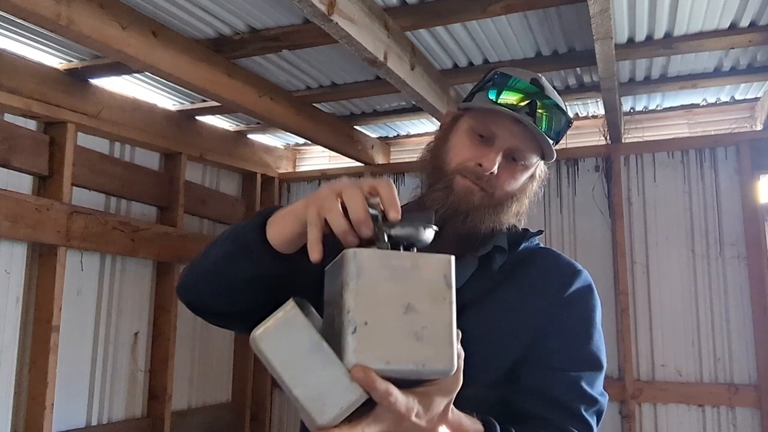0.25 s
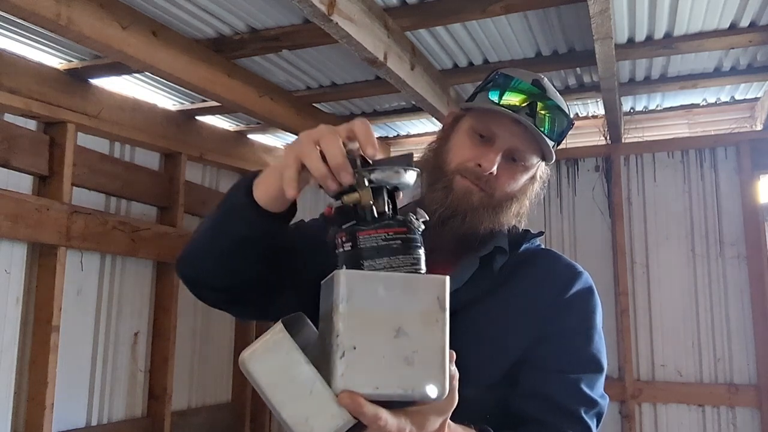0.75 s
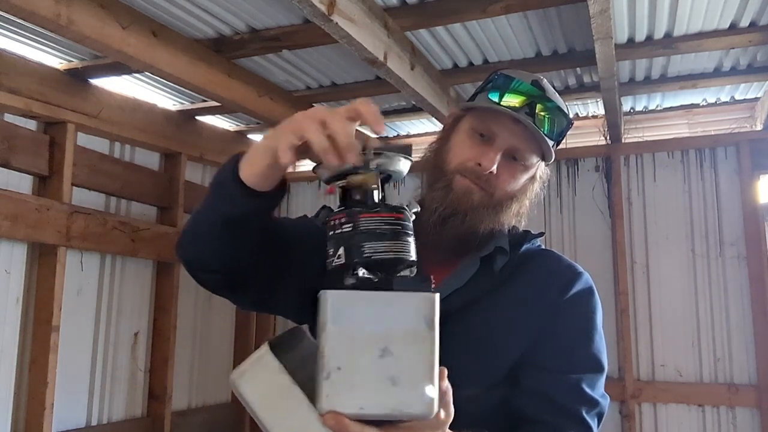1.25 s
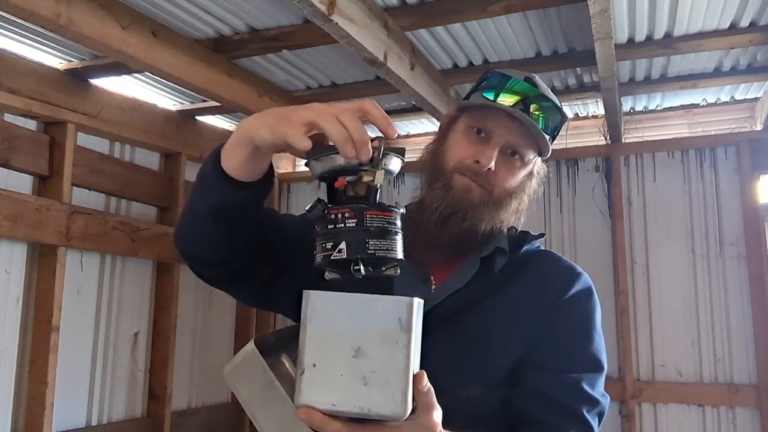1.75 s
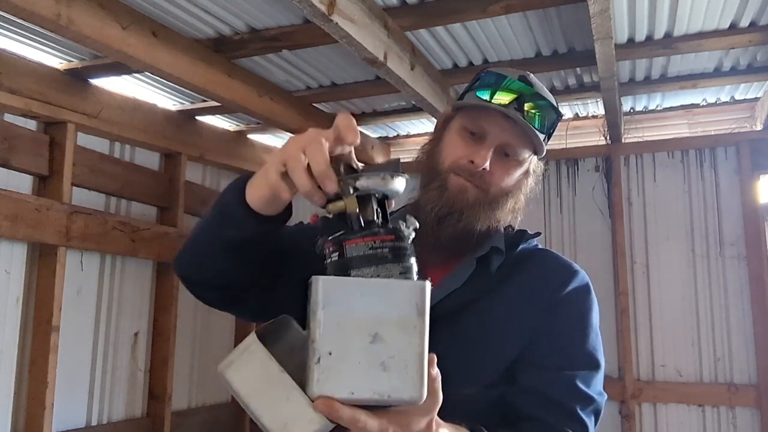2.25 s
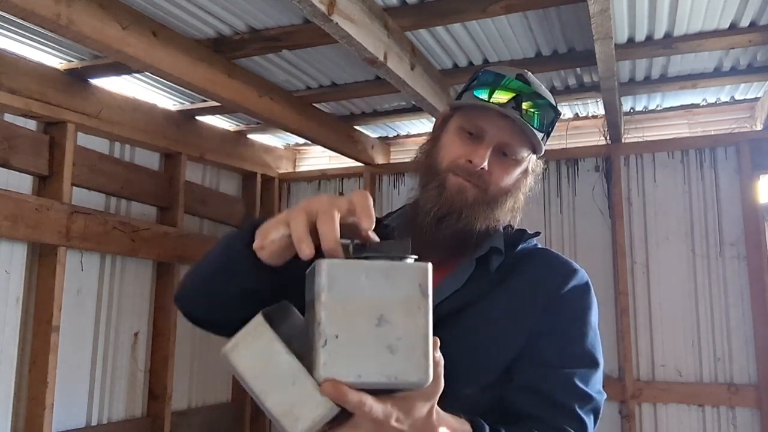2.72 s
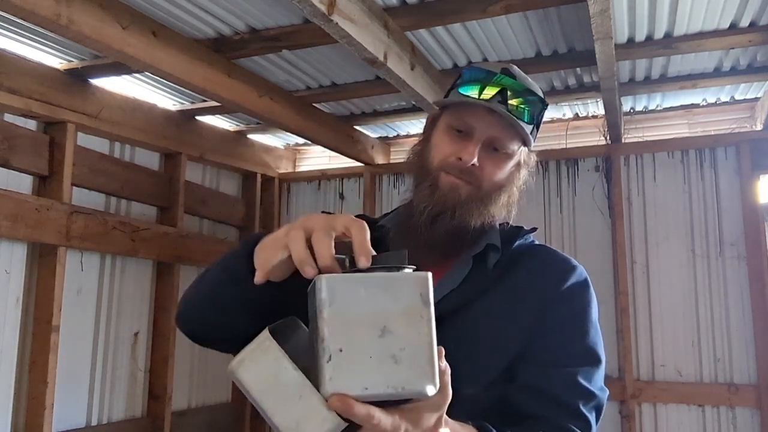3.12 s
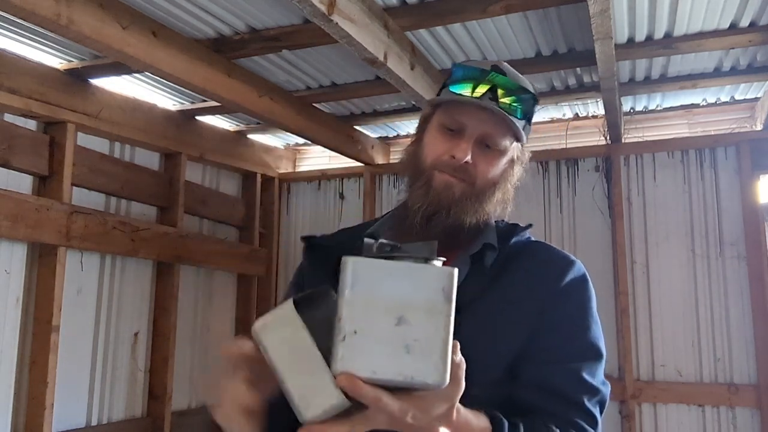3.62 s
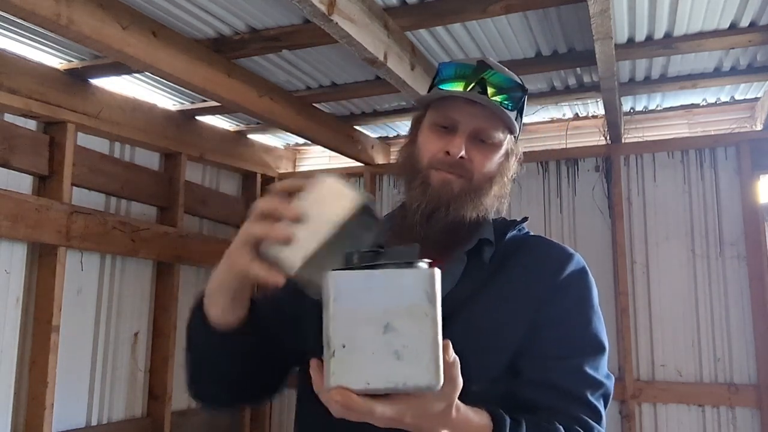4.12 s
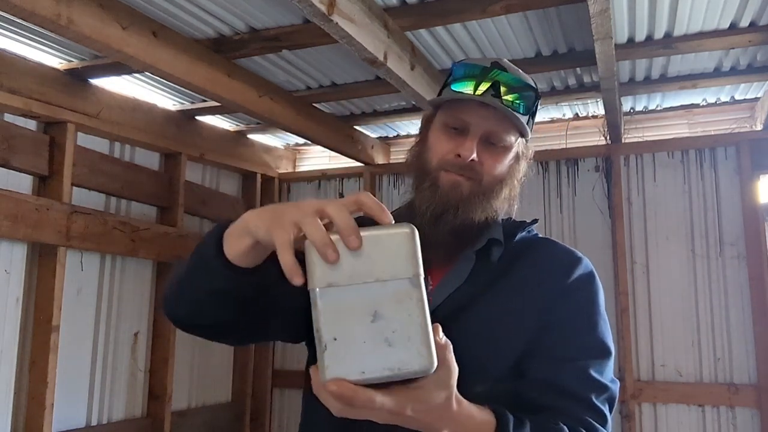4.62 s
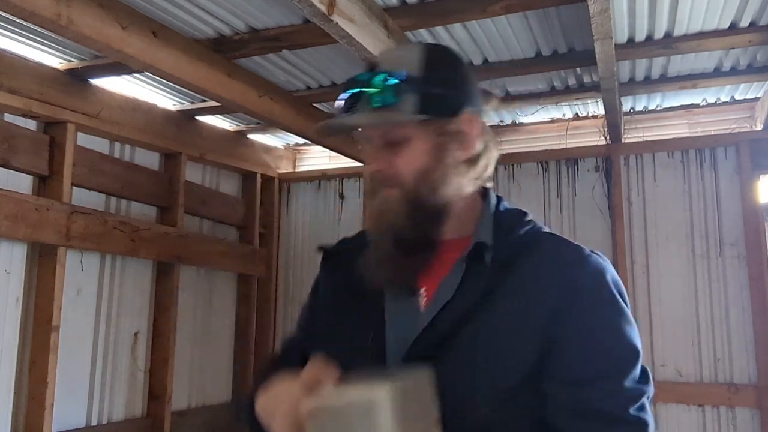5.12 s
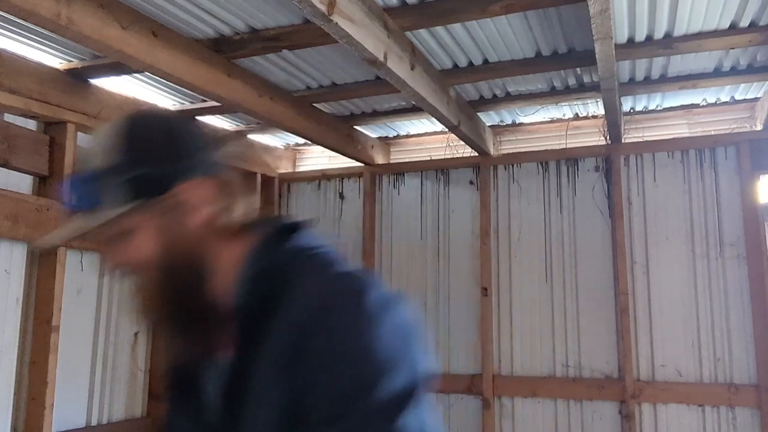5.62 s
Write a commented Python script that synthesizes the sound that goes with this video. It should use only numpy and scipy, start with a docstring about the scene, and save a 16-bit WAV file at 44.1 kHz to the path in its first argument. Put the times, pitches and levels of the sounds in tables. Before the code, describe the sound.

Close handheld metal handling with a short shed reverberation: soft scrapes and small steel pings first, quiet air with distant bird-like chirps next, then a loud ringing clank and a run of boxy knocks. Lighter rattles settle, the lid scrapes and clatters into place with low thuds, and stiff cloth crinkles as the holder turns away.

```python
"""A hand-held square sheet-metal pot knocks, rattles and scrapes in an open shed as a small stove is lifted
out, lowered back in and covered with the lid. Blows ring damped modes over a dense wash; slides excite both
with stick-slip noise. Loose steel parts, and the pot itself after its first hard blow, ping as longer damped
sines, soft pushes are low ones, and a jacket rustles in bursts of filtered noise as the holder turns away.
Faint chirps, a wavering hum and distant air fill the pauses."""
import sys
import numpy as np
from scipy import signal
from scipy.fft import rfft, irfft, next_fast_len
from scipy.io import wavfile
from scipy.ndimage import uniform_filter1d, map_coordinates

SR = 44100
rng = np.random.default_rng(int(sys.argv[2]) if len(sys.argv) > 2 else 0)


def nominal_scale(level):
    """Amplitude ratio for a level in decibels (scalar or array-like)."""
    x = np.asarray(level, float) / 20
    return 10 ** x


def unload_wav(signal):
    """Save mono or channel-first audio to the path in sys.argv[1] as 16-bit WAV at rate SR, clipped to [-1, 1]."""
    wavfile.write(
        sys.argv[1],
        SR,
        np.round(np.clip(np.atleast_2d(signal).T, -1, 1) * 32767).astype(np.int16),
    )


N = 258405
BOOM_HZ, RIM_HZ = 800, 4500  # wall boom lies below the first, rim brightness above the second, clank between


def unit(x):
    """Normalisation: scale to rms 1."""
    return x / np.sqrt(np.mean(x ** 2) + 1e-20)


def along(points, hz):
    """Logarithmic pitch scale: read (Hz, value) points on a log axis."""
    f, v = np.transpose(points)
    return np.interp(np.log(hz + 1), np.log(f + 1), v)


def wobble(rate):
    """Slow random modulation: a smooth curve through rate random knots a second."""
    knots = rng.standard_normal(int(N * rate / SR) + 4)
    return map_coordinates(knots, [np.arange(N) * rate / SR])


def filtered(x, response):
    """Linear filtering: the spectrum of x times a complex response of frequency."""
    m = next_fast_len(N + SR // 2)
    return irfft(rfft(x, m) * response(np.fft.rfftfreq(m, 1 / SR)), m)[..., :N]


def registers(x, response):
    """Band splitting: low, middle and high parts of stereo x after a response, each of rms 1."""
    def split(hz):
        below_boom = 1 / (1 + (hz / BOOM_HZ) ** 8)
        below_rim = 1 / (1 + (hz / RIM_HZ) ** 8)
        return np.array([below_boom, below_rim - below_boom, 1 - below_rim])[:, None]
    return np.array([unit(part) for part in filtered(x, lambda hz: split(hz) * response(hz))])


def pair(alike):
    """Interchannel coherence: two white noises of a given likeness."""
    a, b = rng.standard_normal((2, N))
    turn = np.arccos(np.clip(alike, -1, 1)) / 2
    return np.array([np.cos(turn) * a + np.sin(turn) * b, np.cos(turn) * a - np.sin(turn) * b])


def ring(modes, gains, spread, attack, fuzz_hz):
    """Modal synthesis: damped sines of unsteady pitch, each reaching the two ports with its own phase."""
    hz, db, t60 = np.transpose(modes)[:, :, None]
    hold = 64  # samples between changes of pitch
    t = np.arange(360 * hold) / SR
    decay = gains[:, None] * nominal_scale(db - 60 * t / t60)
    waver = np.repeat(rng.standard_normal((len(hz), 360)), hold, axis=1)
    phase = 2 * np.pi * np.cumsum(hz + fuzz_hz * waver, axis=1) / SR
    skew = spread * rng.standard_normal(hz.shape)
    ports = [(decay * np.sin(phase + side * skew)).sum(0) for side in (1, -1)]
    return np.array(ports) * (1 - np.exp(-t / attack))


def add(mix, sound, s):
    """Superposition: mix a stereo sound in at time s."""
    i = round(s * SR)
    mix[:, i:i + sound.shape[1]] += sound[:, :N - i]


def stroke_db(start, length, press_db, rise, fall):
    """Envelope of one movement, 0 dB at its end: rise and fall in dB a second around a steady press."""
    t = np.arange(N) / SR - start
    onset = rise * np.minimum(t, 0)
    press = press_db * (1 - np.clip(t / length, 0, 1))
    release = fall * np.maximum(t - length, 0)
    return onset - press - release


# Spectrum of the distant air. Each row: frequency in Hz, relative density in dB per Hz.
AIR_SPECTRUM = [(26, -48), (45, -3.5), (123, -3), (170, -11.5), (411, -18.5), (1130, -32.5), (1510, -35.5),
                (1930, -42), (2940, -43), (5430, -54.5), (16000, -69.5)]
# Coherence of the air at the two ports. Each row: frequency in Hz, left-right likeness from 0 to 1.
AIR_COHERENCE = [(60, 0.49), (950, 0.081), (15000, 0.08)]
AIR_DB, HUM_DB = -55.5, -54.5  # levels about which air and hum waver


def air():
    """Diffuse-field coherence: far rumble most alike in the bass, and a frequency-modulated hum that wavers."""
    turn = lambda hz: np.arccos(np.clip(along(AIR_COHERENCE, hz), -1, 1)) / 2
    shape = lambda hz: nominal_scale(along(AIR_SPECTRUM, hz)) * [np.cos(turn(hz)), np.sin(turn(hz))]
    mid, side = filtered(rng.standard_normal((2, N)), shape)
    rumble = nominal_scale(AIR_DB + 2.3 * wobble(11.0)) * unit(np.array([mid + side, mid - side]))
    phase = 2 * np.pi * np.cumsum(120.5 + 3 * wobble(5.4)) / SR
    waver_db = 3.5 * wobble(14)
    return rumble + nominal_scale(HUM_DB + waver_db) * np.sin(phase)


# Reverberation of the shed. Each row: frequency in Hz, t60 in seconds.
SHED_DECAY = [(300, 0.38), (2000, 0.31), (10000, 0.23)]


def shed(x):
    """Reverberant decay: each frequency dies at its own speed; the pot moves, so each moment meets a new answer."""
    step = SR // 8
    late = np.pad(x, ((0, 0), (300 + step, 2 * step)))  # the answer is 300 samples late
    out = np.zeros((2, N + 4 * SR))
    for i in range(0, N + step, step):
        hz, t, z = signal.stft(rng.standard_normal((2, SR // 2)), SR, nperseg=256)
        tail = signal.istft(z * nominal_scale(-60 * t / along(SHED_DECAY, hz)[:, None]), SR, nperseg=256)[1]
        piece = late[:, i:i + 2 * step] * np.hanning(2 * step)
        answer = signal.fftconvolve(piece, tail / np.linalg.norm(tail[0]), axes=1)
        out[:, i:i + answer.shape[1]] += answer
    return out[:, step:step + N]


# Faint far chirps and ticks. Each row: centre in seconds, length in seconds, mean pitch in Hz, level in dB.
FAR_CHIRPS = [ (0.595, 0.07, 3200, -73), (0.747, 0.015, 2830, -65), (0.882, 0.056, 4270, -79),
              (.95, 0.0065, 2480, -64), (1.329, 0.056, 3100, -71), (1.389, 0.013, 2790, -62),
              (1.595, .06, 7100, -79), (1.88, 0.057, 7060, -69)]


def chirps():
    """Random frequency modulation: short fuzzy tones that swell and fade."""
    out = np.zeros((2, N))
    for s, length, hz, db in FAR_CHIRPS:
        count = int(length * SR)
        pitch = hz * (1 + 0.074 * uniform_filter1d(rng.standard_normal((2, count)), size=12))
        tone = np.sin(2 * np.pi * np.cumsum(pitch, axis=1) / SR)
        add(out, nominal_scale(db) * np.hanning(count) * tone, s - length / 2)
    return out


# Dull pushes of hands, lid and body. Each row: start in seconds, level in dB before the soft attack,
# mean pitch in Hz, t60 in seconds.
PUSHES = [(1.843, -35, 120, 0.13), (2.738, -27, 143, 0.17), (4.668, -23, 139, 0.15),
          (4.695, -4.5, 233, 0.032), (4.771, -20, 147, 0.16), (5.224, -28, 171.3, 0.2),
          (5.282, -24, 287, 0.055)]


def thumps():
    """Soft-contact excitation: a slow attack gives only a low, rough push."""
    out = np.zeros((2, N))
    for s, db, hz, t60 in PUSHES:
        add(out, ring([(hz, db, t60)], np.ones(1), spread=0.12, attack=0.027, fuzz_hz=65.3), s)
    return out


# Spectrum of stiff cloth. Each row: frequency in Hz, relative density in dB per Hz.
CLOTH_SPECTRUM = [(120, -29), (200, -4), (394, -4.5), (2020, -9), (2210, -11.5), (16000, -17.5)]
# Jacket rustles. Each row: start in seconds, length in seconds, body level in dB, hiss level in dB.
RUSTLES = [(3.706, 0.011, -68, -77), (5.037, 0.028, -46, -56.5), (5.141, 0.18, -56.5, -67),
           (5.292, 0.026, -48, -59.5), (5.446, 0.024, -49.5, -51.5), (5.531, 0.045, -62.5, -67.5),
           (5.592, 0.036, -58, -52.5), (5.645, 0.032, -56, -56.5), (5.7, 0.046, -61, -66.5),
           (5.793, 0.072, -56.5, -66.5)]
RUSTLE_IN_DB_PER_S, RUSTLE_OUT_DB_PER_S = 550, 287


def jacket():
    """Amplitude-modulated friction noise: stiff cloth folds in lumps and hisses in crinkles."""
    crinkles = nominal_scale(2.2 * wobble(35) + 2.2 * wobble(400))
    folds, rub, hiss = registers(crinkles * pair(0.18), lambda hz: nominal_scale(along(CLOTH_SPECTRUM, hz)))
    body = nominal_scale(1.0) * folds + nominal_scale(-3.5) * rub
    out = np.zeros((2, N))
    for s, length, body_db, hiss_db in RUSTLES:
        move = nominal_scale(stroke_db(s, length, 0, RUSTLE_IN_DB_PER_S, RUSTLE_OUT_DB_PER_S))
        out += move * (nominal_scale(body_db) * body + nominal_scale(hiss_db) * hiss)
    return out


# Loose steel parts, and under the name "grate" the pot's own longer-lasting ring. Each named entry: pitch
# unrest # in Hz, then modes. Each mode: mean frequency in Hz, relative level in dB, t60 in seconds.
STEEL_PARTS = {"leg": (22, [(1295, 3, 0.3), (1575, 3, 0.3), (1925, 0, 0.3), (2750, -2, 0.3)]),
               "grate": (45, [(1120, 1, 0.65), (2305, -9, 0.65), (2905, -5, 0.45), (3755, -5, 0.36),
               (4360, -5, 0.25)]), "valve": (17, [(2595, -8.5, 0.56), (4436, -6, 0.95), (8270, 0, 0.12),
               (10340, 6, 0.09), (12520, 3.5, .1)]), "clip": (230, [(6110, 8.5, 0.077),
               (11270, -3, 0.061)]), "lid edge": (98, [(1850, 16, 0.14), (2300, 4, 0.11)])}
# Pings of those parts. Each row: start in seconds, level in dB, name of the part.
PART_PINGS = [(0.019, -57.5, "leg"), (0.178, -54.5, "leg"), (0.29, -50, "leg"), (0.375, -51.5, "leg"),
              (2.159, -32.5, "grate"), (3.298, -48, "valve"), (4.796, -34.5, "clip"),
              (4.807, -51, "lid edge")]


def pings():
    """Free vibration: lightly damped modes of small parts and of the pot itself, many of them longer or higher
    than the sheet's."""
    out = np.zeros((2, N))
    for s, db, part in PART_PINGS:
        unrest_hz, modes = STEEL_PARTS[part]
        gains = nominal_scale(db + np.zeros(len(modes)))
        add(out, ring(modes, gains, spread=0.25, attack=0.00045, fuzz_hz=unrest_hz), s)
    return out


# Spectrum of the thin sheet's many unresolved modes. Each row: frequency in Hz, relative density in dB per Hz.
SHEET_SPECTRUM = [(150, -51.5), (270, -18.5), (330, 0.5), (700, 9), (870, -8.5), (1190, -20.5),
                  (2810, -12.5), (3350, -25.5), (6910, -40.5), (8100, -44), (11000, -38.5), (16000, -47.5)]


def dense(hz):
    """High modal density: the crowded modes of the sheet as random narrow peaks on its spectrum."""
    peaks = np.interp(hz, np.arange(0, SR, 30), rng.standard_normal(SR // 30))
    return nominal_scale(along(SHEET_SPECTRUM, hz) + 6 * peaks)


# Clear modes of the pot, for slides and knocks. Each row: nominal frequency in Hz, relative level in dB,
# t60 in seconds before a light stroke lengthens it or the grip shortens it.
POT_MODES = [(328.9, -7.5, 0.44), (401.8, 0.5, 0.078), (456.2, -2, 0.14), (506, -6.5, 0.33),
             (524, -6.5, 0.071), (576, 1, 0.031), (665, -3.5, 0.16), (1170.5, -12.5, 0.06),
             (1274.4, -13.5, 0.084), (1392, -29.5, 0.3), (1560, -14, 0.081), (1663, -24.5, 0.21),
             (1870, -21.5, 0.15), (2098, -25, 0.19), (2522, -20.5, 0.19), (2704, -24, 0.15),
             (2830, -24.5, 0.094), (3070, -27.5, 0.38), (3955, -29.5, 0.21), (4415, -33, 0.49),
             (5710, -32, 0.14), (7010, -19.5, 0.35)]
# Stove and lid slide along the walls. Each row: start in seconds, length in seconds, level in dB at the end,
# wall boom in dB and rim brightness in dB, both relative to that level.
WALL_SLIDES = [(0, 0.16, -56.5, 8, -19), (0.17, 0.15, -41.5, 4, -14), (0.316, 0.072, -49, 7.5, -10.5),
               (0.423, 0.13, -67, 1, -29), (2.502, 0.15, -35, 9.5, -7.5), (2.688, 0.076, -19.5, -4.5, -25),
               (3.022, 0.25, -56.5, 8.5, -15), (3.284, 0.047, -40.5, 2, -4.5), (3.367, 0.045, -62, -6, -8),
               (3.78, 0.16, -38, -5.5, -9.5), (3.934, 0.053, -50.5, 8.5, -24),
               (3.969, 0.11, -56.5, 13, -41), (4.087, 0.16, -62.5, -2.5, -15), (4.296, 0.17, -50, 18, -7.5),
               (4.466, 0.072, -43.5, -3, -17), (4.656, 0.018, -44, 12.5, -10.5),
               (4.767, 0.017, -38.5, -1, -9.5)]
# a stroke bites at once, presses harder to its end, then lets go
BITE_DB_PER_S, PRESS_DB, LET_GO_DB_PER_S = 1497, 14, 332.5


def slides():
    """Stick-slip friction: clumped noise keeps the pot's modes and the dense wash humming."""
    clumps = nominal_scale(2.0 * wobble(35) + 3 * wobble(250))
    grit = clumps * pair(0.49)
    mode_hz, mode_db, t60 = np.transpose(POT_MODES)[:, :, None]
    width = np.log(1000) / (np.pi * t60 * 1.8)  # Hz; a light stroke damps the walls less than a blow

    def modes(hz):
        strength = nominal_scale(mode_db + 0.82 * np.log2(mode_hz / BOOM_HZ))
        resonance = 1j * hz * np.sqrt(width) / (mode_hz ** 2 - hz ** 2 + 1j * hz * width)
        return (strength * resonance).sum(0)

    tuned = registers(grit, modes)
    wash = registers(grit[::-1, ::-1], dense)  # reversed in time, ports swapped
    tuned_db, wash_db = np.array([-1, -1, -10]), np.array([-13, -22, -1])  # boom, clank, rim
    parts = nominal_scale(tuned_db)[:, None, None] * tuned + nominal_scale(wash_db)[:, None, None] * wash
    out = np.zeros((2, N))
    for s, length, db, boom_db, rim_db in WALL_SLIDES:
        colour = np.tensordot(nominal_scale(db + np.array([boom_db, 0, rim_db])), parts, axes=1)
        out += nominal_scale(stroke_db(s, length, PRESS_DB, BITE_DB_PER_S, LET_GO_DB_PER_S)) * colour
    return out


# Knocks on the pot. Each row: start in seconds, reference level in dB, wall boom in dB and rim brightness in dB
# relative to it, wall pitch in Hz favoured by the spot struck.
POT_KNOCKS = [(0.017, -40, 2.5, -12, 405), (0.177, -49, 14.5, -8, 506), (0.492, -52, -3, -26, 710),
              (2.156, -14, 11, -17.5, 665), (2.167, -28.5, 15.5, -5.5, 355), (2.177, -22, 3.5, -9.5, 647),
              (2.248, -26.5, 2.5, -19, 555), (2.499, -21.5, 2.5, -4.5, 340), (2.545, -25.5, 2.5, -3.5, 320),
              (2.587, -21, -1, -11, 510), (2.609, -28, 12.5, -9, 450), (2.691, -15, -0.5, -12, 520),
              (2.735, -10, 1, -11, 708), (2.745, -15, 2, -8.5, 466), (2.755, -19, 8.5, -12.5, 585),
              (3.18, -42, 13, -5.5, 388), (3.291, -29, -9, -1, 668), (3.321, -32.5, -4, -0.5, 670),
              (3.788, -40, 8.5, -4.5, 670), (3.827, -17.5, -10.5, -19.5, 524),
              (3.943, -30, -11, -23.5, 690), (4.302, -34.5, -2, -16, 580), (4.312, -18.5, -13, -17.5, 785),
              (4.366, -28, 6, -17, 520), (4.389, -31, 5.5, -17, 570), (4.417, -20.5, 1.5, -12, 524),
              (4.51, -39.5, 10, -9, 390), (4.563, -32, 6, -9, 444), (4.771, -41, 3, -3.5, 484),
              (4.8, -38.5, 15, 5, 508), (5.04, -36.5, -2.5, -26, 344)]
# A hand or the stove's base presses on the wall and damps knocks already ringing.
# Each row: time in seconds, loss in dB.
WALL_PRESSES = [(2.188, 5), (2.855, 16.5), (4.711, 12)]
# The stove hangs loose in the pot. Each row: start in seconds, end in seconds.
LOOSE_SPANS = [(2.52, 2.72), (3.1, 3.4)]
# most blows clank around one pitch; the thin feet of the loose stove tap higher
CLANK_HZ, FEET_HZ = 1466, 2690
LID_ON = 4.29  # s; from here the loose lid rides on the rim and roughens every knock's ring
RIM_UNREST_HZ, GRIP_HZ = 70, 5000  # high modes waver more; the grip mostly shortens those above the second


def knocks():
    """Impulsive modal excitation: each blow rings the clear modes at new strengths over a dying dense wash."""
    out = np.zeros((2, N))
    wash = registers(pair(0.067), dense)
    pot = np.array(POT_MODES)
    hz = pot[:, 0]
    register = (hz > BOOM_HZ).astype(int) + (hz > RIM_HZ)
    lift_db = np.array([-7, 6, 14])  # a hard blow reaches the weak high modes
    wash_t60 = np.array([[0.2], [0.17], [0.12]])  # s, for boom, clank, rim
    wash_drop_db, crack_drop_db = np.array([[13], [12], [7]]), np.array([[12], [9], [3]])
    for s, db, boom_db, rim_db, low_hz in POT_KNOCKS:
        loose = any(a < s < b for a, b in LOOSE_SPANS)
        high_hz = FEET_HZ if loose else CLANK_HZ
        colour_db = db + np.array([boom_db, 0, rim_db])
        low_spot_db = 8 * np.exp(-(np.log(hz / low_hz) / 0.079) ** 2)
        high_spot_db = 5 * np.exp(-(np.log(hz / high_hz) / 0.25) ** 2)
        chance_db = rng.normal(0, 3, len(pot))
        strengths = nominal_scale((colour_db + lift_db)[register] + low_spot_db + high_spot_db + chance_db)

        # each contact shifts the modes, the loose lid most
        shift = hz / 4e5 if s < LID_ON else 0.035
        loaded = pot.copy()
        loaded[:, 0] *= 1 + shift * rng.standard_normal(len(pot))
        loaded[:, 2] /= 1 + (hz / GRIP_HZ) ** 2
        fuzz_hz = (12 if s < LID_ON else 45) + RIM_UNREST_HZ * (hz[:, None] / RIM_HZ) ** 2
        clear = ring(loaded, strengths, spread=0.64, attack=0.0025, fuzz_hz=fuzz_hz)

        t = np.arange(clear.shape[1]) / SR
        start = rng.integers(N - len(t))
        dying = nominal_scale(colour_db[:, None] - wash_drop_db - 60 * t / wash_t60) * (1 - np.exp(-t / 0.0055))
        crack = nominal_scale(colour_db[:, None] - crack_drop_db - 60 * t / 0.027)
        sound = clear + ((dying + crack)[:, None] * wash[:, :, start:start + len(t)]).sum(0)
        for press_s, lost_db in WALL_PRESSES:
            if s < press_s:
                sound = sound * nominal_scale(-lost_db * np.clip((s + t - press_s) / 0.0028, 0, 1))
        add(out, sound, s)
    return out


# The pot turns in the hands. Each row: time in seconds, left-over-right level in dB.
POT_FACING = [(0, 2), (2.16, 1.5), (2.402, 5), (5.86, 2.5)]


def scene():
    """Superposition of direct sound, the shed's reverberation and the background air."""
    s, pan_db = np.transpose(POT_FACING)
    pan_db = np.interp(np.arange(N) / SR, s, pan_db)
    handled = knocks() + slides() + pings() + jacket()
    near = handled * nominal_scale([pan_db / 2, -pan_db / 2]) + thumps() + chirps()
    near[0] = np.roll(near[0], 21)  # samples: the left port is farther away
    return near + nominal_scale(-9.5) * shed(near) + air()


def roll_off(x):
    """The treble ends steeply here."""
    return signal.sosfilt(signal.butter(12, 17000, fs=SR, output="sos"), x)


def record(dry):
    """Close-spaced reception: two ports hear the bass nearly alike, and the response rolls off at both ends."""
    mid, side = (dry[0] + dry[1]) / 2, (dry[0] - dry[1]) / 2

    def spacing(hz):
        ratio = (hz / 480) ** 4
        return 0.97 * np.sqrt((0.12 + ratio) / (1 + ratio))

    def edges(hz):
        bass_cut = (hz / 48) ** 3 / np.sqrt(1 + (hz / 48) ** 6)
        treble_cut_db = -38.5 * np.clip((hz - 15700) / 250 + 0.5, 0, 1)
        return bass_cut * nominal_scale(treble_cut_db)

    side = filtered(side, spacing)
    mix = filtered(np.array([mid + side, mid - side]), edges)
    return roll_off(mix)


dry = scene()
out = record(dry)
unload_wav(out)
```